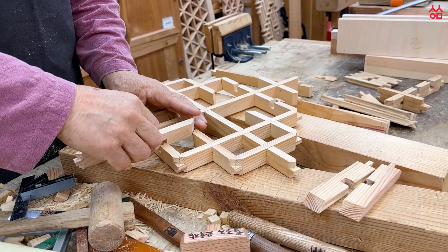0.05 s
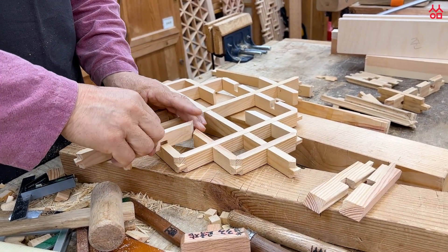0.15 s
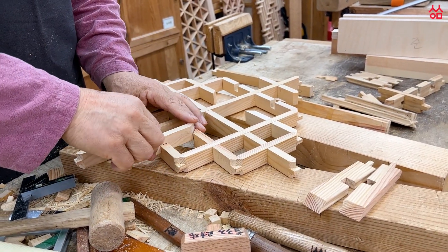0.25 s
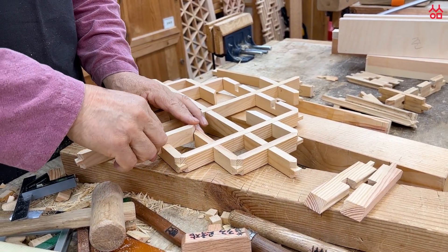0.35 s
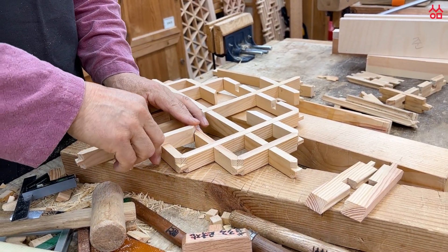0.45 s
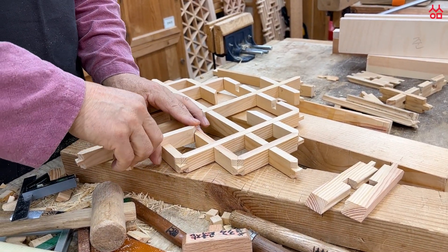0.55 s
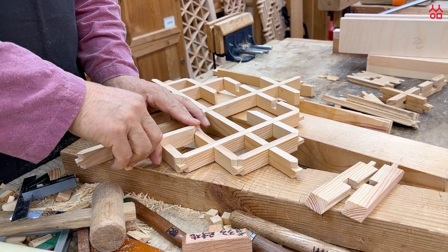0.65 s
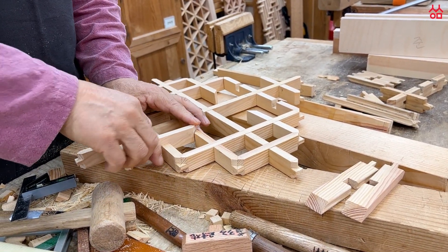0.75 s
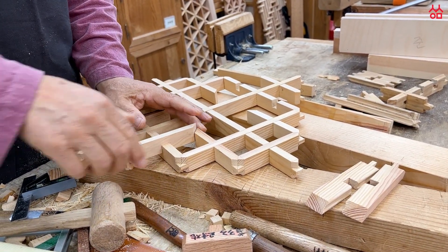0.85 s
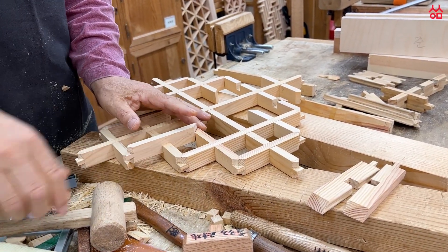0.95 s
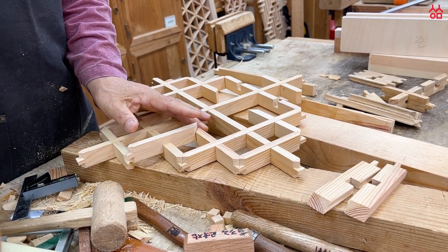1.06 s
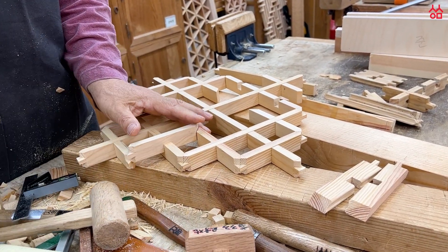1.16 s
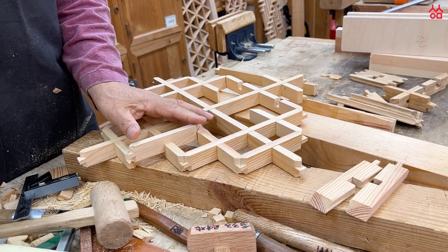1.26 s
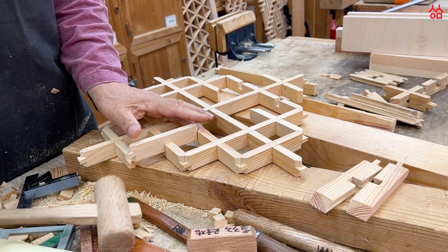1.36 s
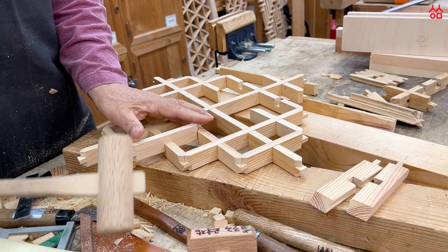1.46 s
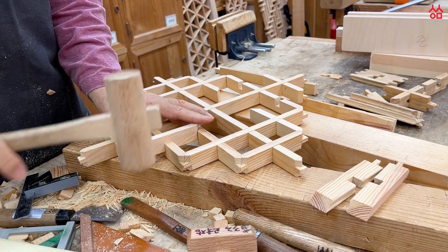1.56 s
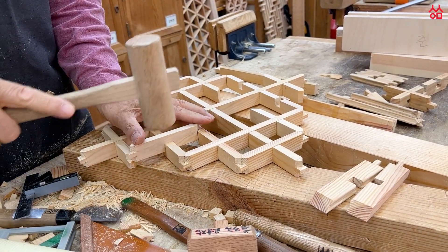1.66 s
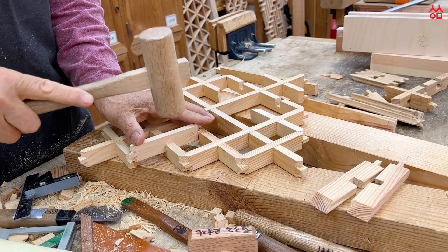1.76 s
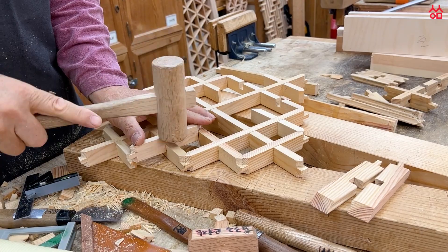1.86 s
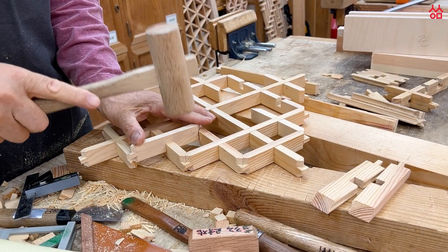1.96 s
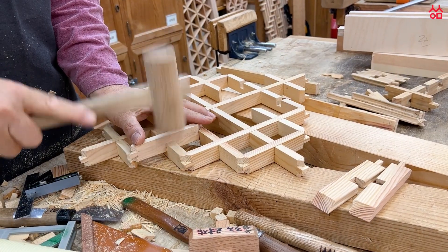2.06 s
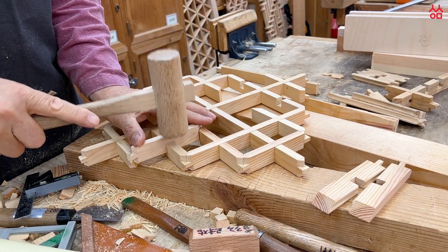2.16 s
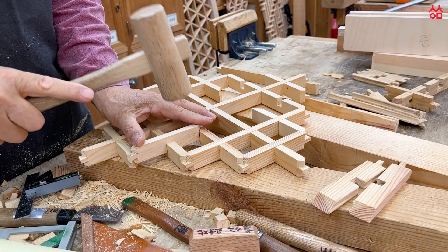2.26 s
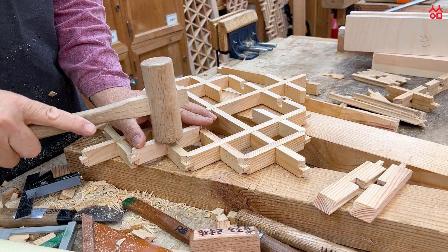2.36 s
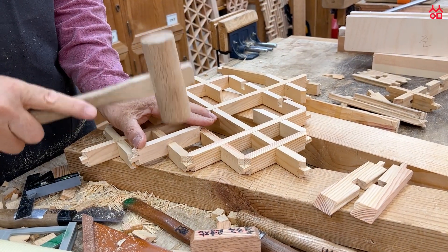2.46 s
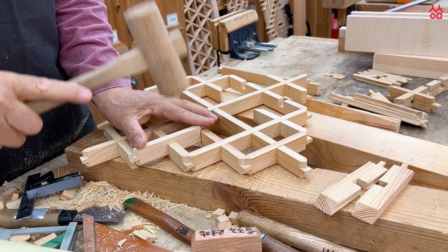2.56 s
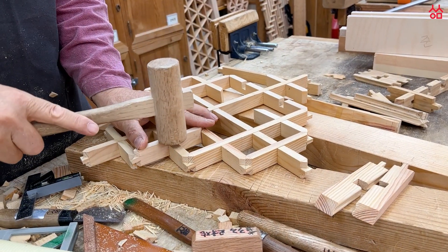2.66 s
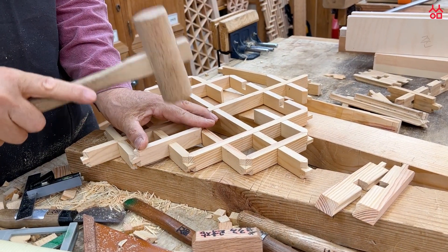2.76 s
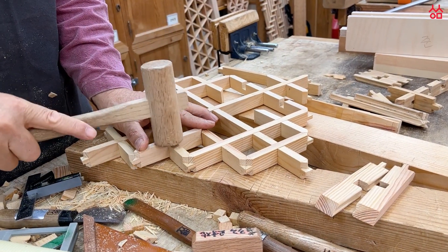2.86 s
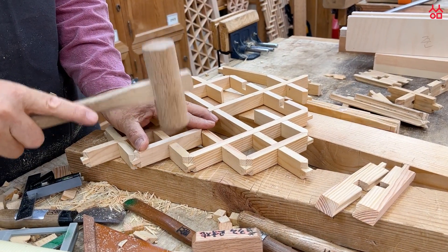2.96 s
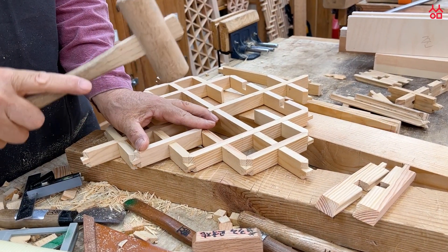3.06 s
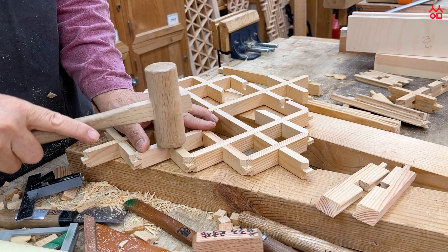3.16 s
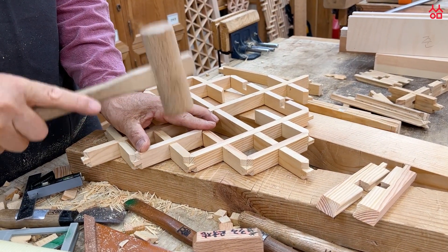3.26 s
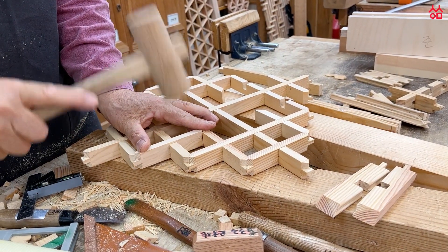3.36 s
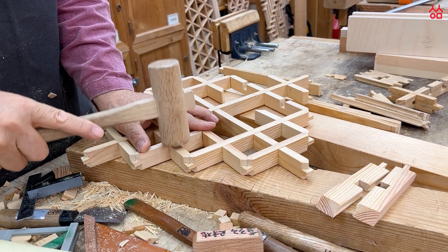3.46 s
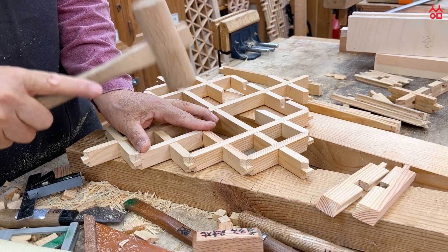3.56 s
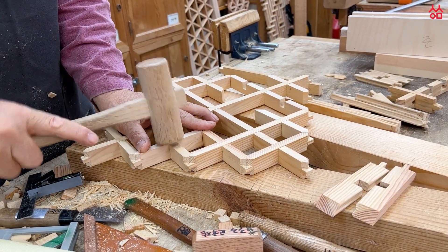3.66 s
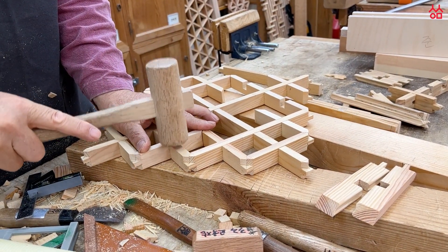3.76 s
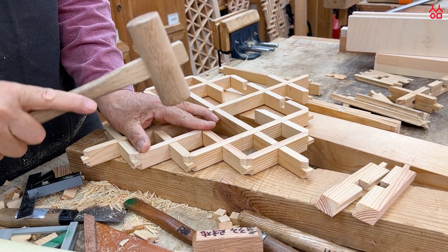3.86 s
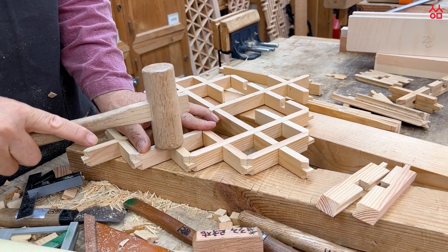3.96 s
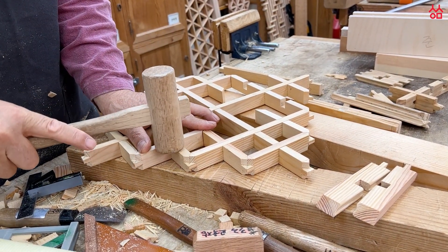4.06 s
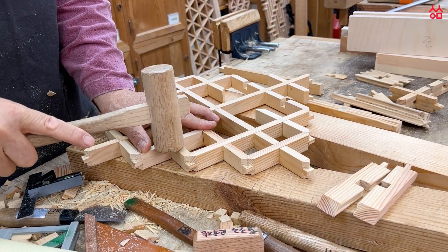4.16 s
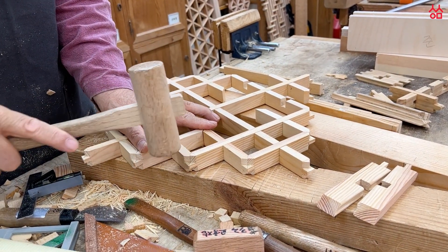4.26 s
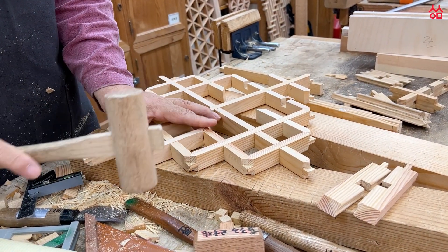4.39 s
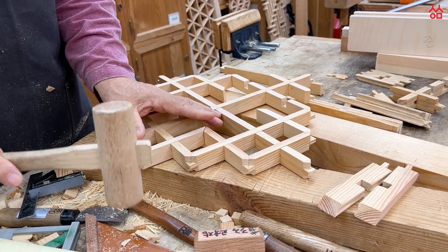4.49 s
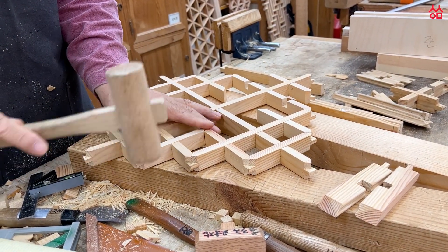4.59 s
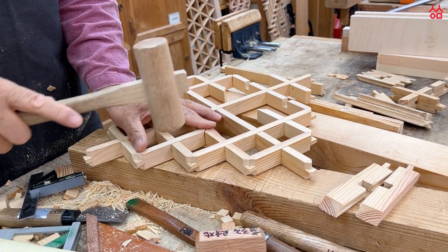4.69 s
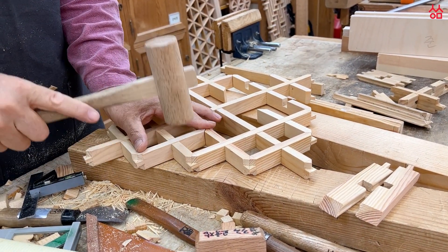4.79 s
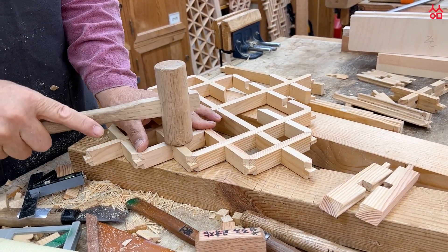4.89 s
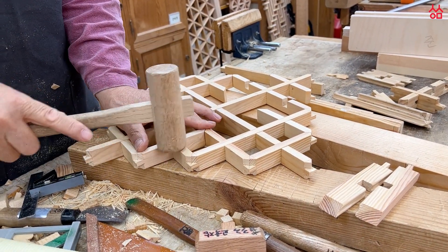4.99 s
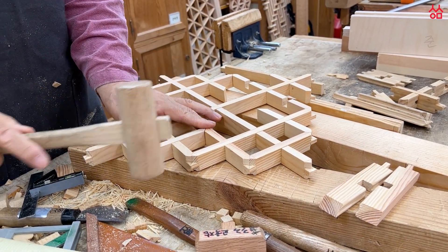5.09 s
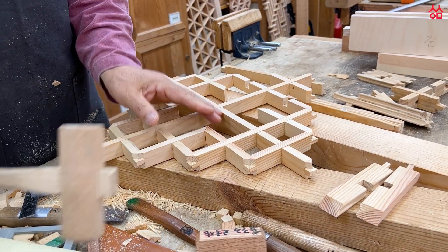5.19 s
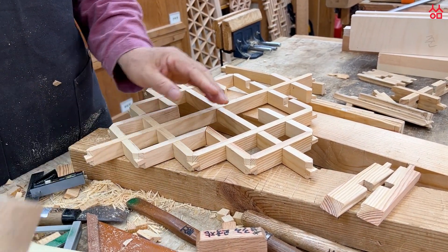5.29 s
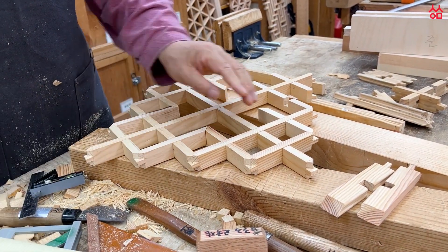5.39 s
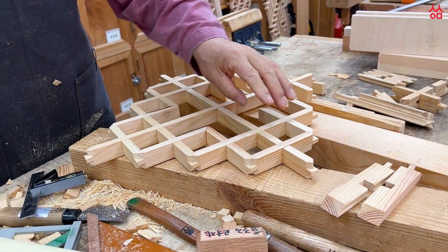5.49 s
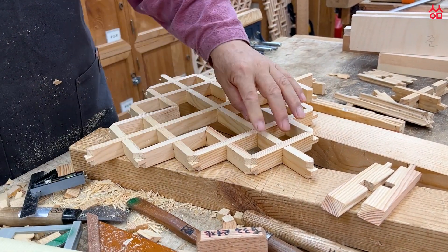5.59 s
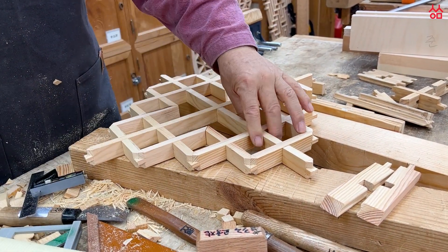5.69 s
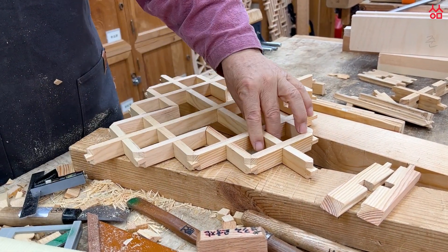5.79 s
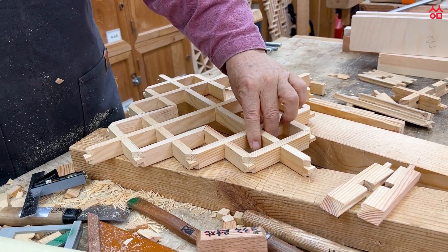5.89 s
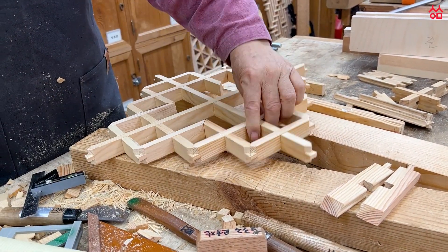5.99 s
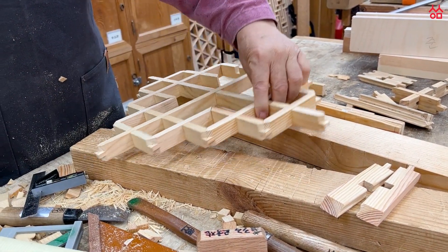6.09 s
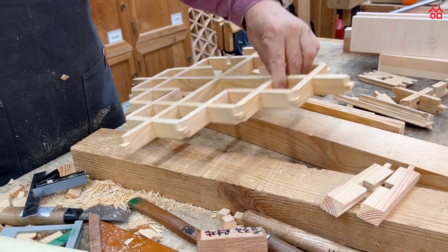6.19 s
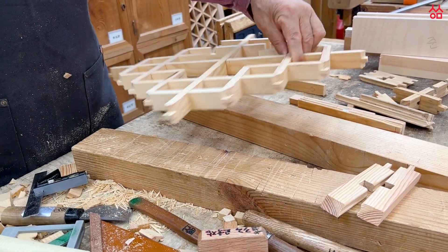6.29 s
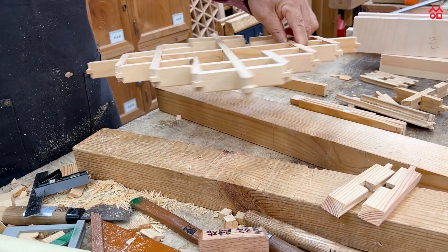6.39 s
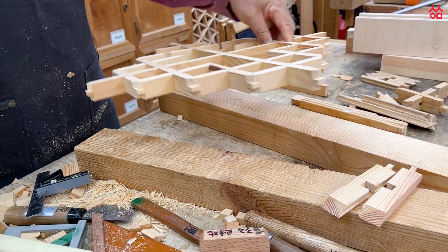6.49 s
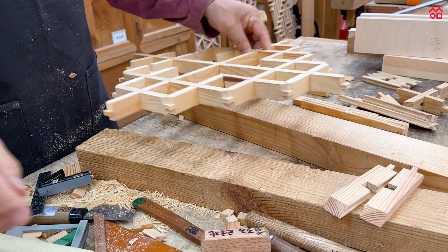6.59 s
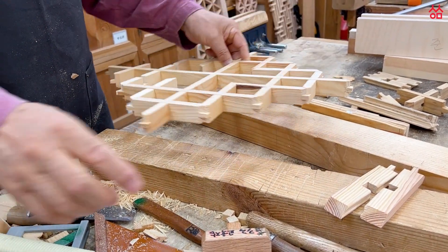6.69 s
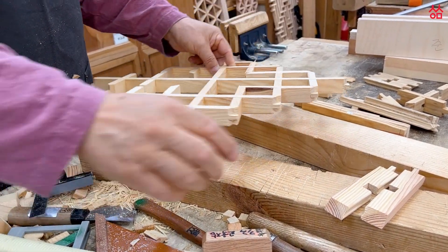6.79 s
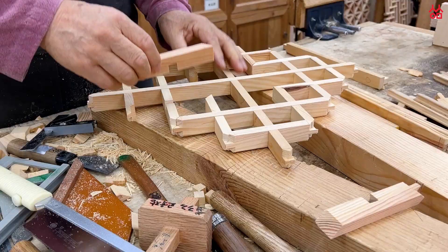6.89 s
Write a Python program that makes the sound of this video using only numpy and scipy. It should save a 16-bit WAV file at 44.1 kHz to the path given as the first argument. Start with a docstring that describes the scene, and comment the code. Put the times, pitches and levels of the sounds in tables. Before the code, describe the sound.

A wooden mallet taps a lattice bar into tight joints on a heavy bench, pitch climbing, then lattice slaps, clatter and hollow clacks.

```python
"""Seating a lattice bar with a mallet

A small, live workshop, close microphone: a bar slides into place and a wooden mallet is picked up. It taps a lattice
bar into its joints on a heavy beam; the ring climbs as the joint tightens, then the seated lattice slaps the beam.
After one last tap the mallet is put down and the lattice lifted off. Struck wood and steel are decaying modes,
with noise bursts for crack and slap; handling, air and a thin whine are shaped noise. Echoes and a dense tail
give the room."""
import sys
import numpy as np
from scipy import signal
from scipy.fft import rfft, irfft, next_fast_len
from scipy.io import wavfile
from scipy.ndimage import uniform_filter1d

SR = 44100
rng = np.random.default_rng(int(sys.argv[2]) if len(sys.argv) > 2 else 0)


def write(x):
    x = np.atleast_2d(x).T
    wavfile.write(sys.argv[1], SR, np.round(np.clip(x, -1, 1) * 32767).astype(np.int16))


N = 306054
TIME = np.arange(N) / SR
AGE = TIME[:int(0.6 * SR)]  # time since a blow, for long rings and the room
BRIEF = TIME[:int(0.08 * SR)]  # time since a blow, for its short parts

# Room air. Each row: frequency in Hz, relative level in dB per Hz.
AIR_COLOUR = [(18, -52), (30, -23.5), (199, -3), (384, -4.5), (415, 1.5), (461, -2.5), (584, -7.5),
              (721, -9), (844, -11), (3490, -9), (6720, -21), (8740, -22), (16000, -51.5)]
AIR_DB = -60
# The air and whine step down around the hammering: from and to in seconds, by a level in dB.
HUSH_FROM_S, HUSH_TO_S, HUSH_DB = 1.582, 5.282, -8
# Thin steady whine. Each row: frequency in Hz, width in Hz, level in dB before the spells below.
WHINE_LINES = [(5400, 110, -81), (6230, 100, -88), (7640, 200, -76), (8657, 260, -69.5),
               (10336, 180, -87.5)]
# The whine comes and goes. Each row: start in seconds, length in seconds, gain in dB.
WHINE_SPELLS = [(0, .47, 2), (1.08, 4.2, 3), (5.3, 1.12, 6.5)]
WHINE_ATTACK_S, WHINE_RELEASE_S = 0.15, 0.12

# Dense room sound. Each row: frequency in Hz, relative level in dB per Hz.
ROOM_COLOUR = [(40, -34), (140, -16), (250, -6), (450, -9), (750, -1.5), (1600, -9.5), (2500, -7),
               (3500, -8.5), (5000, -3.5), (7500, -3), (15000, -5)]
# How long the room lasts. Each row: frequency in Hz, 60 dB decay time in seconds.
ROOM_T60 = [(100, 0.18), (400, 0.51), (1500, 0.36), (4500, 0.4), (8000, 0.32), (15000, 0.099)]
# First echoes from ceiling and shelves. Each row: delay in seconds, level in dB.
ECHOES = [(0.012, -20), (0.0157, -17.5)]

# A sleeve sweeps past as the arm reaches. Each row: start in seconds, length in seconds, level in dB.
SLEEVE_SWEEPS = [(0, 1.45, -65), (4.42, .1, -70.5), (5.35, 0.32, -60), (5.8, 0.35, -55), (6.72, 0.25, -59)]
SWEEP_ATTACK_S, SWEEP_RELEASE_S = 0.18, 0.11
# Cloth of the sleeve. Each row: frequency in Hz, relative level in dB per Hz.
SLEEVE_COLOUR = [(35, -32.5), (60, -5), (290, -20), (316, -7), (504, -22.5), (672, -5), (1340, -3),
                 (6310, -19.5), (12000, -30.5), (15600, -75), (22000, -120)]
# Fingers push and shift the wood. Each row: start in seconds, length in seconds, friction in dB, rumble in dB.
PUSHES = [(0, 0.014, -52.5, -53), (0.113, .04, -59.5, -59), (0.226, 0.04, -52, -47.5),
          (0.335, 0.22, -63.5, -62), (0.766, 0.092, -49, -61), (0.88, 0.023, -49.5, -47.5),
          (5.834, .08, -73, -48), (6.113, 0.12, -72, -60.5)]
PUSH_ATTACK_S, PUSH_RELEASE_S = 0.026, 0.027
# Friction of wood. Each row: frequency in Hz, relative level in dB per Hz.
RUB_COLOUR = [(60, -8), (200, 5), (450, -1), (900, -10), (2000, -0.5), (3000, 4.5), (4500, -8),
              (7000, -16.5), (15000, -36)]
# Dull shifting of fingers. Each row: frequency in Hz, relative level in dB per Hz.
FUMBLE_COLOUR = [(30, -2), (80, -6), (180, 0), (300, -7), (600, -15.5), (2000, -25), (16000, -66)]
# The bar slides in its slot. Each row: start in seconds, length in seconds, level in dB.
SLIDES = [(.79, .04, -60), (.97, 0.059, -61)]
SLIDE_ATTACK_S, SLIDE_RELEASE_S = 0.04, 0.023
# Thin hiss of the slot. Each row: frequency in Hz, relative level in dB per Hz.
SLIDE_COLOUR = [(1000, -40.5), (4800, -15.5), (5500, -1), (6200, -18), (12000, -38)]

# The mallet head drags over the bench. Each row: start in seconds, length in seconds, level in dB.
DRAGS = [(1.217, 0.17, -42), (1.455, .1, -55), (5.638, .075, -34.5)]
DRAG_ATTACK_S, DRAG_RELEASE_S = 0.017, 0.023
# Scraping of the mallet head. Each row: frequency in Hz, relative level in dB per Hz.
DRAG_COLOUR = [(60, -2), (200, -3), (420, 11), (750, -18), (1300, -7.5), (2400, -2), (4000, -20),
               (8000, -16), (16000, -52)]
# It chatters as it drags; the mean level is relative to the scraping.
CHATTER_DB, CHATTER_CONTACT_HZ, CHATTER_THUMP_DB, CHATTER_RING_HZ = -1.5, 2770, 11.5, 2540

# Steel tool on the bench. Each row: frequency in Hz, level in dB before the jog, 60 dB decay time in seconds.
STEEL_MODES = [(5990, -37.5, 0.41), (6230, -46, 0.23), (7830, -49, 0.42), (9500, -45, 0.28),
               (10260, -51, .3), (10940, -56, 0.43), (11700, -58, .28)]
# The tool is jogged as the mallet is put down. Each row: time in seconds, gain in dB.
JOGS = [(5.628, 1.5), (5.701, -7.5)]

# Lattice hanging free, ringing longer. Each row: frequency in Hz, relative level in dB, 60 dB decay in seconds.
FREE_LATTICE_MODES = [(281, -16.5, 0.048), (774, -22, .025), (931, -16, 0.22), (1794, 1, 0.029),
                      (1936, 2.5, 0.017), (2100, -24, 0.01), (2265, -6.5, 0.11), (3080, -14.5, 0.02),
                      (3290, -25, 0.027), (3750, -18, 0.091)]
# The lifted lattice clacks and bounces, each bounce sooner and weaker than the last.
CLACK_S, CLACK_DB, BOUNCE_DB = 5.9296, -13.5, -5.5
BOUNCE_GAP_S, BOUNCE_SHARE = 0.052, 0.625

# The struck lattice. Each row: mean frequency in Hz, relative level in dB, 60 dB decay time in seconds.
LATTICE_MODES = [(646, -7, 0.01), (968, -11.5, 0.021), (1265, -19, 0.017), (1638, -6, 0.022),
                 (1732, -1.5, .022), (2300, -12, .012), (3218, -5, 0.013), (3454, -4.5, 0.014),
                 (4530, -5.5, 0.012), (5720, -10, 0.032)]
# Long low rings of beam and bench. Each row: frequency in Hz, relative level in dB, 60 dB decay in seconds.
BEAM_MODES = [(105.3, -39, 0.74), (133.5, -32, .5), (155, -38, 0.64), (186, -25, .38), (255, -26, 0.33),
              (264.8, -22, 0.34), (282, -30, 0.48), (314, -26.5, 0.28), (382.3, -20, 0.3),
              (443, -34.5, 0.11), (536, -29.5, 0.28), (664, -31.5, 0.17), (737, -26.5, 0.12),
              (751, -27.5, 0.18)]
# Short noisy crack of wood on wood. Each row: frequency in Hz, relative level in dB per Hz.
CRACK_COLOUR = [(50, -50), (200, -21.5), (900, -11.5), (2000, 3.5), (4000, 3), (6000, -5.5), (7500, -7.5),
                (11000, -10), (16000, -23)]
# Slap of the lattice on the beam. Each row: frequency in Hz, relative level in dB per Hz.
SLAP_COLOUR = [(40, -46.5), (100, -20.5), (250, 8), (430, -1), (700, 3.5), (1000, -4), (1400, -3),
               (2500, -9.5), (6000, -18), (16000, -28.5)]

# Loose wood knocking as bar, mallet and lattice are handled. Each row: time in seconds, level in dB,
# contact cut-off in Hz, beam thump in dB, ring in Hz, ring in dB; thump and ring are relative to the level.
KNOCKS = [(0.108, -44.5, 3020, -14, 2350, 6), (0.207, -44.5, 3470, 2, 2680, 4),
          (0.224, -39, 3230, -5, 2160, 3), (0.243, -38.5, 3470, -4, 3040, 0),
          (0.650, -52, 900, 10.5, 1480, -10), (0.886, -42.5, 11000, 8, 7150, -1),
          (1.166, -44, 850, 11.5, 1480, -10), (1.1887, -36, 3070, -9, 2440, 7),
          (1.202, -29, 3500, -1, 2450, 9), (1.241, -26.5, 8240, -2, 2370, 2),
          (1.252, -30, 7000, 2, 2630, -1), (1.2778, -23, 6530, -13, 2420, 2.5),
          (1.287, -29, 3600, 1, 1910, 11), (1.312, -36, 5000, 8, 2730, 11),
          (1.3385, -30.5, 5900, -12, 3000, -2), (1.362, -25.5, 3170, 7.5, 2355, 8),
          (5.222, -50, 5000, 11.5, 2750, -4), (5.508, -32.5, 744, 17.5, 873, -5.5),
          (5.5633, -29, 1830, 13, 870, 5), (5.6297, -18.5, 4200, 11.5, 2120, 4.5),
          (5.646, -23, 1590, 5.5, 2090, -4), (5.663, -35.5, 3000, 10, 2000, 17),
          (5.675, -27.5, 5060, 14, 2980, -8), (5.701, -27, 7100, 8, 5650, -8),
          (5.720, -26.5, 7700, -4, 3310, 0), (5.842, -42, 7040, -6, 1250, 3.5),
          (6.427, -47.5, 6000, -15, 4670, 1), (6.539, -40, 783, 6.5, 894, -2),
          (6.563, -43.5, 5600, -10.5, 3770, 6)]
KNOCK_SLAP_DB = -11
# Hollow thud of loose wood on the bench top. Each row: frequency in Hz, relative dB, 60 dB decay in seconds.
KNOCK_THUD_MODES = [(253, -16, 0.17), (365.3, -6, 0.025), (444, -2.5, 0.014)]
# The seated lattice jumps and slaps back on the beam. Each row: time in seconds, level in dB,
# contact cut-off in Hz, beam thump in dB relative to the level.
REBOUNDS = [(3.7031, -13.5, 2100, 6.5), (3.710, -3.5, 2850, -4), (3.725, -16, 1500, 2),
            (3.948, -9, 4400, -13), (4.0672, -18, 2390, 12), (4.080, -25, 1400, -2.5)]
REBOUND_RING_HZ, REBOUND_RING_DB, REBOUND_SLAP_DB = 1920, 0.5, 12

# Mallet blows. Each row: time in seconds, level in dB, contact cut-off in Hz, beam thump in dB,
# joint ring in Hz, joint ring in dB, slap on the beam in dB; the last three dB are relative to the level.
BLOWS = [(1.8496, -8, 2200, -1, 3200, -16.5, -22), (2.0984, -3, 3640, -6, 3597, 0, -18.5),
         (2.3630, -3.5, 5000, -3, 4540, 0.5, -3.5), (2.6274, -3.5, 6550, -3, 5110, 0.5, -26.5),
         (2.8823, -1.5, 7000, -4, 5130, 0.5, -14), (3.1415, -0.5, 6800, -4, 5140, -1.5, -13),
         (3.4178, 1, 6200, -4, 5240, -3.5, -11.5), (3.6884, 1, 5000, 1, 4980, -10.5, 6.5),
         (3.9332, 0.5, 6500, -1, 5455, -4, 5.5), (4.8622, -2.5, 2290, 0, 5020, 1, -4)]
# Short thud under a mallet blow. Each row: frequency in Hz, relative level in dB, 60 dB decay in seconds.
BLOW_THUD_MODES = [(367, 0.5, .022), (394, -9, 0.0091)]


def undb(db):
    """Decibels to gain."""
    return 10 ** (np.asarray(db) / 20)


def unit(x):
    """Scale to rms 1."""
    return x / np.sqrt(np.mean(x ** 2))


def at_hz(points, hz):
    """Read (Hz, value) points on a log-frequency axis."""
    f, value = np.transpose(points)
    return np.interp(np.log(np.maximum(hz, 1)), np.log(f), value)


def filtered(x, order, cut_hz, kind="low"):
    """Butterworth filter, low-pass unless told otherwise."""
    return signal.sosfilt(signal.butter(order, cut_hz, kind, fs=SR, output="sos"), x)


def noise(colour, size):
    """Noise of rms 1 with the given spectrum."""
    n = next_fast_len(size)
    spectrum = rfft(rng.standard_normal(n))
    gain = undb(at_hz(colour, np.fft.rfftfreq(n, 1 / SR)))
    return unit(irfft(spectrum * gain, n)[:size])


def walk(rate):
    """A random level that wanders to a new value rate times a second."""
    return np.interp(TIME * rate, np.arange(4096), rng.standard_normal(4096))


def add(out, x, s):
    """Mix x into out from time s on."""
    i = max(int(s * SR), 0)
    out[i:i + len(x)] += x[:len(out) - i]


def envelope(rows, attack_s, release_s):
    """Gain over time for (start s, length s, dB) rows: each rises up to its start, holds, then dies away."""
    gain = np.zeros(N)
    for start, length, db in rows:
        rise = np.clip(1 + (TIME - start) / attack_s, 0, 1)
        fall = np.exp(-np.clip((TIME - start - length) / release_s, 0, 20))
        gain = np.maximum(gain, undb(db) * rise * fall)
    return gain


def decay(age, t60):
    """Exponential fade that falls 60 dB in t60 seconds."""
    return np.exp(-np.log(1000) * age / t60)


def ring(modes, age, lag_s=0.000941):
    """Decaying modes; bending waves are slower at low pitch, so the lows speak later (lag_s at 1 kHz)."""
    out = 0
    for hz, db, t60 in modes:
        t = np.maximum(age - lag_s * np.sqrt(1000 / hz), 0)
        out = out + undb(db) * decay(t, t60) * np.sin(2 * np.pi * hz * t)
    return out


def burst(colour, t60, rise_s):
    """Countless short modes at once: a quickly dying noise."""
    return noise(colour, len(BRIEF)) * decay(BRIEF, t60) * (1 - np.exp(-BRIEF / rise_s))


def background():
    """Room air with a thin whine, both stepping down from shortly before the first blow until after the last."""
    hz = np.fft.rfftfreq(N, 1 / SR)
    white = rfft(rng.standard_normal(N))
    lines = sum(undb(db) * unit(np.exp(-2 * ((hz - f) / width) ** 2)) for f, width, db in WHINE_LINES)
    whine = irfft(white * lines, N) * envelope(WHINE_SPELLS, WHINE_ATTACK_S, WHINE_RELEASE_S)
    air = undb(AIR_DB + 0.92 * walk(rate=13)) * noise(AIR_COLOUR, N)
    hushed = 1.0 * ((TIME > HUSH_FROM_S) & (TIME < HUSH_TO_S))
    hush = uniform_filter1d(hushed, size=200)  # soften the step, in samples
    return (air + whine) * undb(HUSH_DB * hush)


def first_echoes(x, dull_hz=6500):
    """A few distinct reflections, with softened treble, alongside the dense room sound."""
    out = np.zeros(N)
    soft = filtered(x, 2, dull_hz)
    for delay_s, db in ECHOES:
        add(out, undb(db) * soft, delay_s)
    return out


def workshop(x, gap_s=0.0075, build_s=0.0022):
    """Dense reflections from bench, shelves and walls; each octave dies at its own rate."""
    hz = np.fft.rfftfreq(len(AGE), 1 / SR)
    white = np.exp(2j * np.pi * rng.random(len(hz))) * undb(at_hz(ROOM_COLOUR, hz))
    centres = np.geomspace(60, 15360, 9)
    late = np.maximum(AGE - gap_s, 0)
    response = 0
    for centre, share in zip(centres, np.eye(len(centres))):
        fade = decay(late, at_hz(ROOM_T60, centre)) * (1 - np.exp(-late / build_s))
        # octave bands overlap as triangles on the log-frequency axis
        octave = irfft(white * at_hz(np.c_[centres, share], hz), len(AGE))
        response = response + unit(fade) * octave
    return signal.fftconvolve(x, response)[:N]


def all_round(x, size=71):
    """What a blow radiates over all directions: a compact pulse with any one direction's notches filled in."""
    power = uniform_filter1d(np.abs(rfft(x)) ** 2, size // 4, mode="nearest")
    broad = uniform_filter1d(power, size, mode="nearest")
    # the treble has more lobes, so it evens out more
    share = np.clip(np.fft.rfftfreq(len(x), 1 / SR) / 2000, 0, 1)
    even = power + share * (broad - power)
    # the causal half of the cepstrum gives the minimum-phase pulse
    cepstrum = irfft(np.log(np.abs(even) + 1e-18))
    causal = cepstrum[:len(cepstrum) // 2]
    return irfft(np.exp(rfft(causal, len(cepstrum)) - cepstrum[0] / 2))


def hands():
    """Grainy friction of wood, hiss of the slot, dull shifting of fingers, and the smoother swish of a sleeve."""
    friction = envelope([(s, length, db) for s, length, db, _ in PUSHES], PUSH_ATTACK_S, PUSH_RELEASE_S)
    rumble = envelope([(s, length, db) for s, length, _, db in PUSHES], PUSH_ATTACK_S, PUSH_RELEASE_S)
    sweep = envelope(SLEEVE_SWEEPS, SWEEP_ATTACK_S, SWEEP_RELEASE_S)
    rub = noise(RUB_COLOUR, N) * undb(2 * walk(rate=110)) * friction
    slide = noise(SLIDE_COLOUR, N) * envelope(SLIDES, SLIDE_ATTACK_S, SLIDE_RELEASE_S)
    fumble = noise(FUMBLE_COLOUR, N) * undb(2 * walk(rate=65)) * rumble
    sleeve = noise(SLEEVE_COLOUR, N) * undb(1.3 * walk(rate=60)) * sweep
    return rub + slide + fumble + sleeve


def drag():
    """Uneven scraping of the mallet as it is taken up and laid down: noise with a fast wandering level."""
    scrape = noise(DRAG_COLOUR, N) * undb(3.4 * walk(rate=270))
    return scrape * envelope(DRAGS, DRAG_ATTACK_S, DRAG_RELEASE_S)


def chatter(count=4, spread_db=6, ring_db=4):
    """A few light knocks at chance moments of each drag, with the columns of KNOCKS."""
    rows = []
    for start, length, db in DRAGS:
        for k, (when, strength) in enumerate(rng.random((count, 2))):
            s = start + length * (k + when) / count
            level_db = db + CHATTER_DB + spread_db * (strength - 0.5)
            rows.append((s, level_db, CHATTER_CONTACT_HZ, CHATTER_THUMP_DB, CHATTER_RING_HZ, ring_db))
    return rows


def steel_tool():
    """A thin bright ring of steel modes at each jog."""
    out = np.zeros(N)
    for s, db in JOGS:
        add(out, undb(db) * ring(STEEL_MODES, AGE), s)
    return out


def bounces(count=4):
    """(s, dB) of each clack: the gaps shrink by a fixed share, the level by a fixed step."""
    gaps = BOUNCE_GAP_S * BOUNCE_SHARE ** np.arange(count)
    return [(CLACK_S + gaps[:k].sum(), CLACK_DB + k * BOUNCE_DB) for k in range(count)]


def lifted_lattice(room_db=1):
    """Hollow clacks of free modes as the lattice leaves the beam. Returns near sound and the room's share."""
    near, far = np.zeros(N), np.zeros(N)
    for s, db in bounces():
        hollow = ring(FREE_LATTICE_MODES, BRIEF, lag_s=0.00187)
        slap = undb(-6) * burst(SLAP_COLOUR, t60=0.031, rise_s=0.0004)
        clack = undb(db) * filtered(hollow + slap, 4, 4200)
        add(near, clack, s)
        add(far, undb(room_db) * all_round(clack), s)
    return np.array([near, far])


def strikes(table, beam, thud, scatter, crack_t60, slap_t60, ring_t60):
    """Wood on wood: the lattice cracks and rings, the beam thumps. Returns near sound and the room's share."""
    near, far = np.zeros(N), np.zeros(N)
    # narrow pieces of wood radiate little of their bass
    thud = filtered(thud, 3, 225, "high")
    for s, db, contact_hz, thump_db, ring_hz, ring_db, slap_db in table:
        # no two blows land on quite the same spot
        modes = [(hz * (1 + scatter * rng.standard_normal()), mode_db, t60) for hz, mode_db, t60 in LATTICE_MODES]
        joint = (ring_hz, ring_db, ring_t60)
        wood = filtered(ring(modes + [joint], BRIEF), 2, 500, "high")
        wood += burst(CRACK_COLOUR, crack_t60, rise_s=0.00091)
        wood += undb(slap_db) * burst(SLAP_COLOUR, slap_t60, rise_s=0.005)
        # a softer contact pushes for longer and leaves out the treble
        hit = undb(db) * filtered(wood + undb(thump_db) * thud, 2, contact_hz)
        add(near, hit, s)
        add(near, undb(db + thump_db) * beam, s)
        add(far, all_round(hit), s)
    return np.array([near, far])


def loose_wood(bench_db=-8, light_hz=120):
    """Lighter knocks and rebounds, after which the bench rings more quietly and less deeply."""
    knocks = [(*row, KNOCK_SLAP_DB) for row in list(KNOCKS) + chatter()]
    rebounds = [(*row, REBOUND_RING_HZ, REBOUND_RING_DB, REBOUND_SLAP_DB) for row in REBOUNDS]
    beam = undb(bench_db) * ring(BEAM_MODES, AGE)
    thud = ring(KNOCK_THUD_MODES, BRIEF)
    sound = strikes(knocks + rebounds, beam, thud, scatter=0.05, crack_t60=0.025, slap_t60=0.02, ring_t60=0.027)
    return filtered(sound, 2, light_hz, "high")


def mallet():
    """Firm blows that drive the bar home and shake the whole bench into its low modes."""
    beam = ring(BEAM_MODES, AGE, lag_s=0.002)
    thud = ring(BLOW_THUD_MODES, BRIEF)
    return strikes(BLOWS, beam, thud, scatter=0.024, crack_t60=0.019, slap_t60=0.024, ring_t60=0.014)


def scene():
    """Mallet and loose wood in the room, over handling noise and room air."""
    near, far = mallet() + loose_wood() + lifted_lattice()
    room = first_echoes(near) + undb(-1) * workshop(far)
    return (near + room + steel_tool() + drag() + hands() + background())[None]


def record(dry, ceiling=0.7, low_cut_hz=86, top_hz=16200):
    """The close microphone overloads on loud peaks, rounding them off; rumble and top are cut."""
    rounded = dry / (1 + (dry / ceiling) ** 4) ** (1 / 4)
    lean = filtered(rounded, 4, low_cut_hz, "high")
    mellow = filtered(lean, 1, 14000)
    return signal.sosfilt(signal.ellip(8, 0.2, 70, top_hz, fs=SR, output="sos"), mellow)


dry = scene()
out = record(dry)
write(out)
```